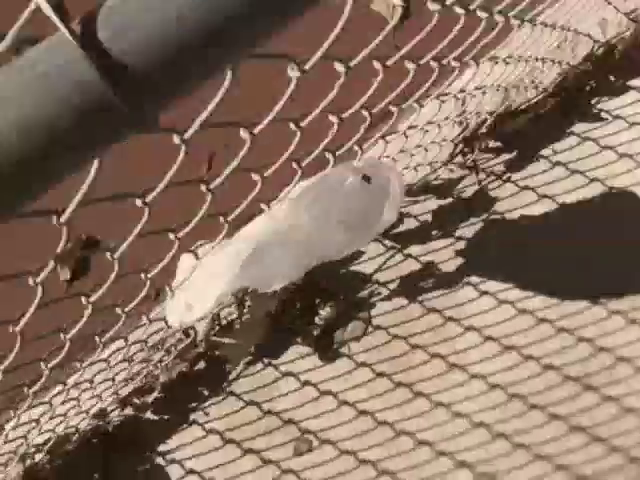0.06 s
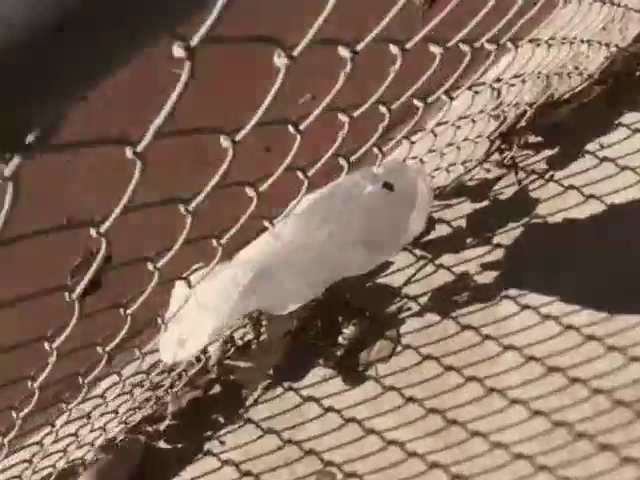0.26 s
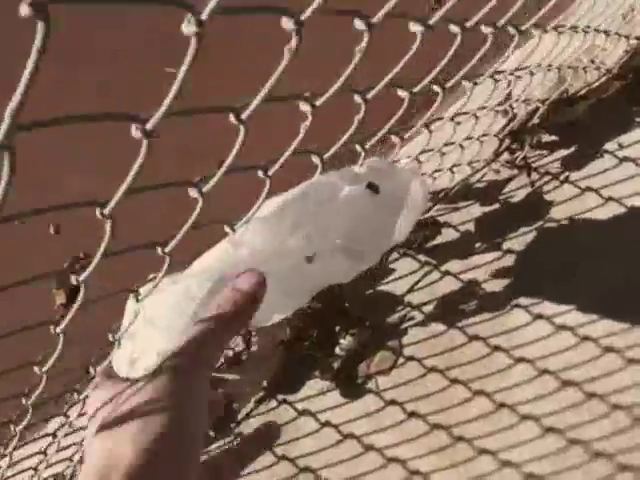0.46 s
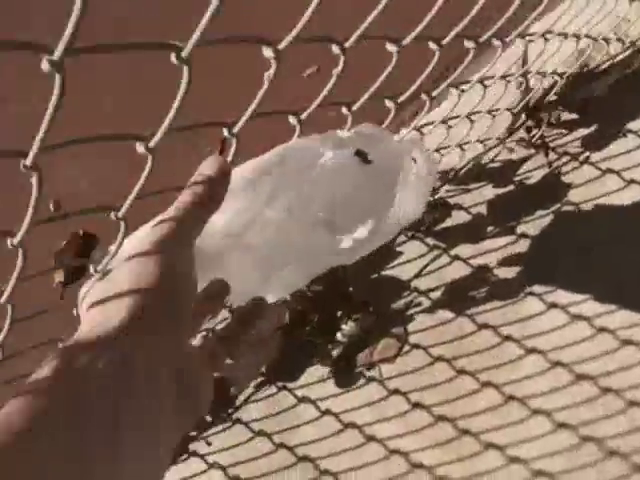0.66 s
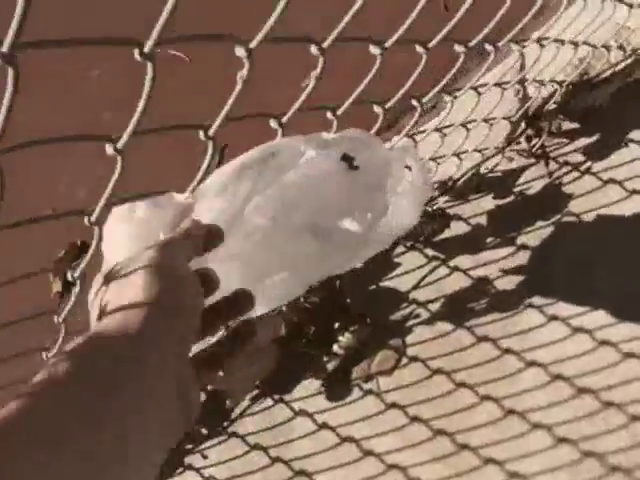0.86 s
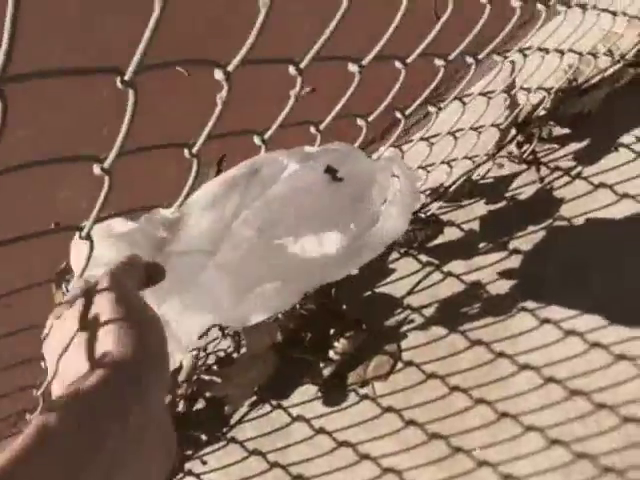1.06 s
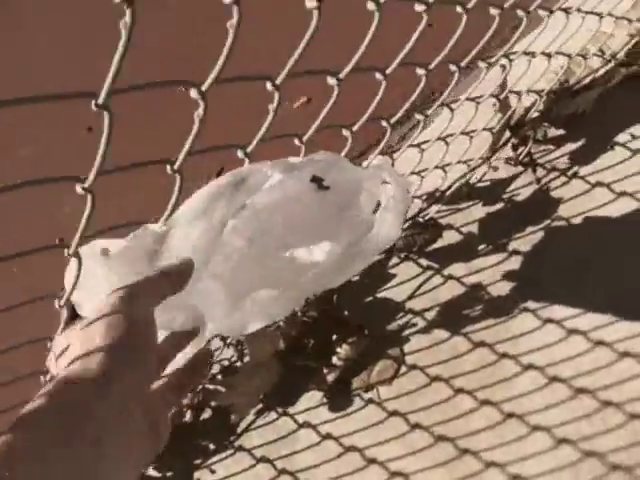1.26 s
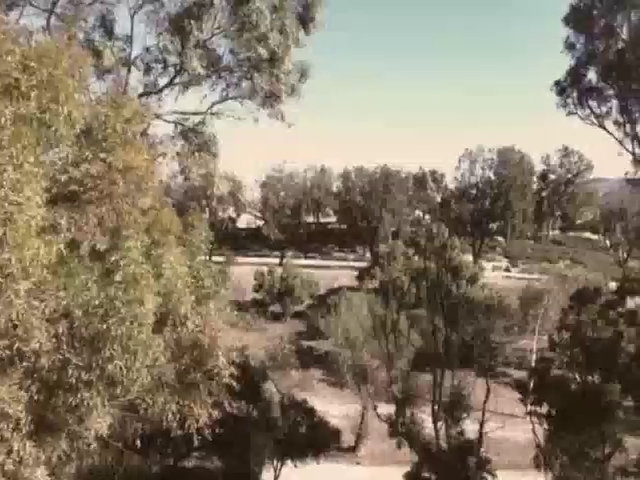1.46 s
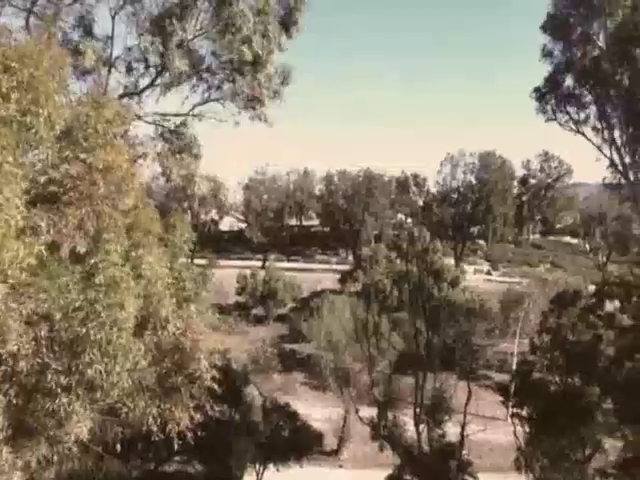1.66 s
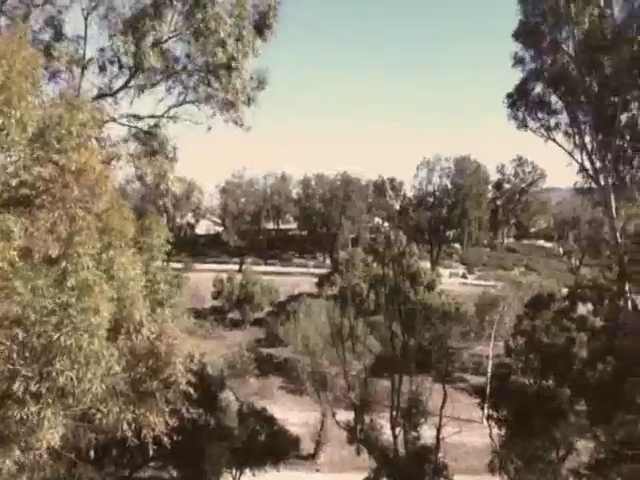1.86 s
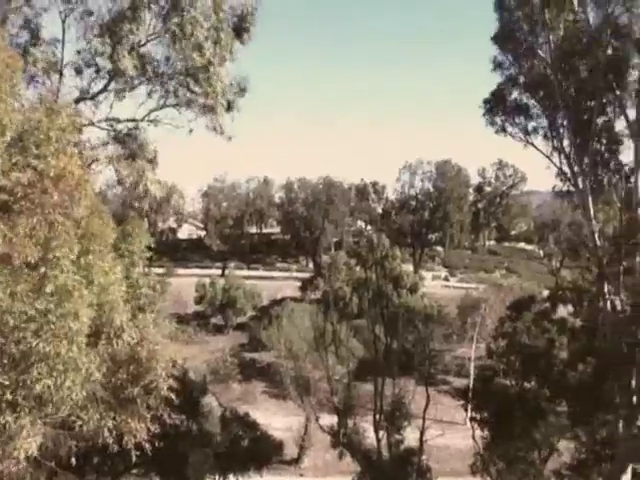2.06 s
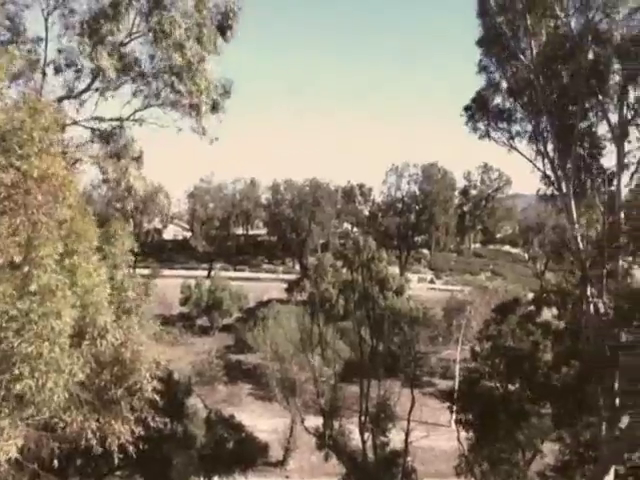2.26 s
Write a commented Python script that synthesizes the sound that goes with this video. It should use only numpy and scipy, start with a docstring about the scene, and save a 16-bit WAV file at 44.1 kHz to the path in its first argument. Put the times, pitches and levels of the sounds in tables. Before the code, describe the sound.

Wind buffets the microphone throughout with uneven rumble, slaps and thumps, hardest from 0.2 to 0.5 seconds. A tiny rustle opens the sound. From 0.5 to 1.45 seconds, a hand strokes thin plastic close by in four quiet, hissing, crackly sweeps. After a momentary dropout near 1.5 seconds, the wind thumps strongly again over the faint hiss of distant trees, easing off by about 2.3 seconds.

```python
"""Outdoors by a fence, with wind buffeting the microphone and a hand stroking thin plastic close by. The wind
rumbles and roars, and its eddies slap and thump on the microphone. A scrap of rustle comes first; then the
plastic, lying against the fence, hisses and crackles in four sweeps as skin slides and catches on it. After a
brief gap the scene changes: wind blows on over the soft hiss of distant trees."""
import sys
import numpy as np
from scipy import signal
from scipy.fft import rfft, irfft
from scipy.io import wavfile
from scipy.ndimage import uniform_filter1d

SR = 44100
rng = np.random.default_rng(int(sys.argv[2]) if len(sys.argv) > 2 else 0)


def materialize(psi):
    """Save the field psi as 16-bit PCM at rate SR to the path in sys.argv[1].

    A 1-D psi becomes a single channel; in a 2-D psi each row is a channel.
    """
    bounded = np.clip(np.atleast_2d(psi).T, -1, 1)
    quanta = np.round(bounded * 32767).astype(np.int16)
    wavfile.write(sys.argv[1], SR, quanta)


N = 105840
TIME, FREQS = np.arange(N) / SR, np.fft.rfftfreq(N, 1 / SR)
DROPOUT_S = 1.478  # the fence is heard before this, the trees after
LEAD = 1024  # samples ahead of a burst's onset


def amp(db):
    """Decibels to gain."""
    return 10 ** (np.asarray(db) / 20)

def unit(x):
    """Scales to rms 1."""
    return x / np.sqrt(np.mean(x ** 2) + 1e-20)

def curve(points):
    """Joins (seconds, value) points with straight lines."""
    return np.interp(TIME, *np.transpose(points))

def gain_at(freqs, spectrum):
    """Gain at each frequency, from (Hz, dB) points."""
    hz, db = np.transpose(spectrum)
    return amp(np.interp(np.log(freqs), np.log(hz), db))

def colour(x, spectrum):
    """Gives x a spectrum, at rms 1."""
    return unit(irfft(rfft(x) * gain_at(FREQS + 1, spectrum), N))

def noise(spectrum):
    """Steady noise shaped by (Hz, dB) points."""
    return colour(rng.standard_normal(N), spectrum)

def steadied(x, size):
    """Evens out chance swells longer than size samples."""
    return x / np.sqrt(uniform_filter1d(uniform_filter1d(x ** 2, size), size) + 1e-9)

def burst(peak_s, shape, size=4096):
    """A short swirl of noise, coloured by shape(Hz); about rms 1 at its height."""
    age = np.maximum(np.arange(size) - LEAD, 0) / SR / peak_s
    swell = (age * np.exp(1 - age)) ** 2
    swirl = rfft(swell * rng.standard_normal(size))
    swirl /= abs(swirl) + abs(swirl).mean()  # no chance resonance stands out
    sound = irfft(swirl * shape(np.fft.rfftfreq(size, 1 / SR) + 1))
    return unit(sound) * np.sqrt(np.mean(swell ** 2))

def add(mix, start_s, sound):
    """Mixes in a burst, allowing for its lead."""
    part = mix[max(round(start_s * SR) - LEAD, 0):][:len(sound)]
    part += sound[:len(part)]


# Wind pressure right on the microphone. Each row: time in seconds, level in dB.
WIND_PRESSURE = [(0, -37.5), (.022, -35), (.05, -48), (.078, -39), (.108, -46.5), (.155, -45), (.175, -31),
                 (.235, -22), (.28, -23.5), (.37, -31), (.44, -22.5), (.51, -21.5), (.575, -31.5),
                 (.68, -34.5), (.715, -21.5), (.79, -34), (.9, -23.5), (.97, -32.5), (1.015, -31.5),
                 (1.06, -41.5), (1.1, -31), (1.145, -40.5), (1.2, -25.5), (1.255, -46), (1.29, -31.5),
                 (1.39, -38), (1.465, -53), (1.495, -25), (1.555, -20.5), (1.59, -36.5), (1.68, -31.5),
                 (1.77, -37.5), (1.83, -45), (1.93, -39), (2.0, -33), (2.06, -30), (2.12, -32.5),
                 (2.165, -45), (2.22, -36.5), (2.265, -55), (2.31, -47), (2.4, -46.5)]
# Its low rumble and its higher roar. Each row: frequency in Hz, relative level in dB.
RUMBLE_SPECTRUM = [(20, -60), (40, -53), (62, -21), (100, -8), (140, 0.5), (185, 3.5), (260, -10.5),
                   (330, -10), (420, -17), (600, -31), (1000, -40.5), (2500, -82)]
ROAR_SPECTRUM = [(100, -31), (250, 3), (400, 3.5), (700, -9.5), (1100, -24), (1700, -32.5), (3500, -68.5)]

def wind(strong_db=-20, roar_growth=1.69):
    """Turbulence flutters and rumbles at the microphone; the roar grows faster as the wind rises."""
    level_db = curve(WIND_PRESSURE)
    flutter = np.tanh(noise([(5, -7), (18, 7), (45, -4), (110, -25), (400, -69)]))
    rumble = amp(level_db + 3 * flutter) * steadied(noise(RUMBLE_SPECTRUM), size=1200)
    roar_db = -30 + roar_growth * (level_db - strong_db) + 2 * flutter
    return rumble + amp(roar_db) * steadied(noise(ROAR_SPECTRUM), size=800)


# The background at the fence. Each row: frequency in Hz, relative level in dB.
FENCE_SPECTRUM = [(20, -21), (100, 0.5), (800, -3), (1500, -5.5), (2700, -10), (5000, -14), (9000, -19.5),
                  (15500, -24)]

def fence_air():
    """Faint open air all around the microphone."""
    return amp(-59.5) * noise(FENCE_SPECTRUM) * (TIME < DROPOUT_S)


# A rustle close by. Each row: frequency in Hz, relative level in dB.
RUSTLE_SPECTRUM = [(300, 9.5), (1200, -3), (3900, -2.5), (7500, -6.5), (8300, -15), (11700, -8.5),
                   (15500, -18)]
# Two thin rings within it. Each row: pitch in Hz, starting level in dB.
RUSTLE_RINGS = [(4500, -43), (12400, -50)]

def rustle(end_s=0.044, ring_width_hz=54, ring_fade_s=0.02):
    """A scrap of rustle with two fading rings, which stops short."""
    out = amp(-38.5) * noise(RUSTLE_SPECTRUM)
    for hz, db in RUSTLE_RINGS:
        resonance = 1 / (1 + ((FREQS - hz) / ring_width_hz) ** 2)
        ring = irfft(rfft(rng.standard_normal(N)) * resonance, N)
        out += amp(db) * unit(ring) * np.exp(-TIME / ring_fade_s)
    return out * (TIME < end_s)


# Loose plastic against the fence, barely heard. Each row: frequency in Hz, relative level in dB.
CRINKLE_SPECTRUM = [(500, -6), (1500, -3), (4000, -3), (7000, -5), (11000, -9.5), (15500, -13)]

def crinkles(ticks_per_s=130):
    """The wind stirs the loose plastic into faint ticks."""
    impulses = rng.standard_normal(N) * (rng.random(N) < ticks_per_s / SR)
    grain = rng.standard_normal(200) * np.hanning(200)
    ticks = signal.oaconvolve(impulses, grain, "same")
    return amp(-69) * colour(ticks, CRINKLE_SPECTRUM) * (TIME < DROPOUT_S)


# Eddies striking the microphone itself. Each row: start in seconds, slap level in dB,
# thump level in dB (both ahead of the overload), top of the slap in Hz.
EDDY_HITS = [(.021, -31, -31, 700), (.1695, -16.5, -20, 1700), (.176, -27, -22, 600),
             (.212, -20, -14.5, 850), (.226, -21.5, -17.5, 1600), (.251, -25, -18.5, 1100),
             (0.2974, -8, -24, 2350), (.304, -13, -18.5, 1280), (.308, -28, -9.5, 497),
             (.350, -23, -28, 1270), (.383, -28.5, -24, 1000), (.414, -18, -17.5, 1090),
             (0.4244, -8.5, -22, 1700), (.428, -13.5, -15, 2100), (.432, -13.5, -8.5, 520),
             (0.4628, -12, -22, 555), (.497, -21, -29, 960), (.506, -18.5, -22, 700),
             (0.594, -47, -22, 450), (.620, -39, -25.5, 450), (0.694, -29, -30, 810), (.706, -26, -21, 655),
             (.723, -21, -21, 805), (.762, -29.5, -21.5, 500), (.806, -43, -24.5, 450),
             (.850, -36, -24, 600), (.877, -20, -25, 1320), (.885, -15, -14.5, 825), (.930, -29, -29, 650),
             (.995, -53, -43, 450), (1.198, -22.5, -26, 480), (1.280, -31, -22.5, 580),
             (1.312, -33, -33, 543), (1.499, -17, -21, 800), (1.544, -13.5, -13, 1050),
             (1.604, -18, -15, 990), (1.609, -11.5, -16, 860), (1.644, -23, -21, 780),
             (1.679, -27, -27, 710), (1.695, -24.5, -21, 1180), (1.740, -37, -30, 860),
             (1.806, -33, -30, 720), (1.912, -36, -31.5, 597), (1.955, -37, -24.5, 500),
             (2.030, -33, -34, 900), (2.036, -17.5, -25, 1300), (2.043, -24.5, -30, 1190),
             (2.050, -25.5, -25, 940), (2.062, -40, -28, 600), (2.1, -28.5, -21, 694),
             (2.117, -39, -29, 700), (2.134, -33.5, -30, 890), (2.199, -61, -34.5, 400)]

def eddies(thump_hz=216.2, thump_octaves=0.54, overload_db=-3, low_hz=98, high_hz=2850):
    """Each eddy is a bright slap and a slower low thump; the hardest softly overload the microphone."""
    def slap_shape(f, top_hz):
        bass_cut = 1 + (174 / f) ** 4.5  # the microphone sheds the deepest bass
        slope = 1 + (f / 338) ** 2.02
        top_cut = 1 + (f / top_hz) ** 4.46
        return 1 / (bass_cut * slope * top_cut)

    def thump_shape(f):
        return np.exp(-0.5 * (np.log2(f / thump_hz) / thump_octaves) ** 2)

    pressure = np.zeros(N)
    for start_s, slap_db, thump_db, top_hz in EDDY_HITS:
        slap_peak_s = 0.0021 * (1020 / top_hz) ** 0.37  # brighter slaps are quicker
        slap = burst(slap_peak_s, lambda f: slap_shape(f, top_hz))
        thump = burst(peak_s=0.0043, shape=thump_shape)
        add(pressure, start_s, amp(slap_db) * slap + amp(thump_db) * thump)
    overloaded = amp(overload_db) * np.tanh(pressure / amp(overload_db))
    band = 1 / (1 + (low_hz / (FREQS + 1)) ** 11) / (1 + (FREQS / high_hz) ** 11)
    return irfft(rfft(overloaded) * band, N)


# Creases in the plastic, close by. Each row: start in seconds, level in dB, pitch in Hz.
CREASE_SNAPS = [(.031, -42, 6060), (.036, -38.5, 7100), (0.036, -36.5, 11100), (.078, -53, 4200),
                (.088, -42, 810), (.089, -45.5, 1950), (.187, -56, 5040), (0.321, -59, 3700),
                (.574, -45, 5030)]

def creases(peak_s=0.0012, width_octaves=0.3):
    """Creases give way with tiny snaps."""
    out = np.zeros(N)
    for start_s, db, hz in CREASE_SNAPS:
        snap = burst(peak_s, lambda f: 1 / (1 + (np.log2(f / hz) / width_octaves) ** 2))
        add(out, start_s, amp(db) * snap)
    return out


# The hand sweeping over the plastic at the fence. Each row: time in seconds, level in dB.
HAND_SWEEPS = [(.458, -73), (.478, -56.5), (.54, -53), (.62, -46.5), (.69, -48), (.725, -42.5),
               (.76, -39.5), (.785, -44), (.805, -58), (.85, -49.5), (.925, -45), (1.0, -50.5),
               (1.056, -55.5), (1.14, -46.5), (1.205, -44.5), (1.26, -53), (1.33, -48.5), (1.415, -44.5),
               (1.45, -55), (1.478, -63)]
# The thin film, heard from close by. Each row: frequency in Hz, relative level in dB.
FILM_SPECTRUM = [(300, -13), (900, -3.5), (1600, 0), (2750, -2), (3700, 1), (5200, 0.5), (7000, -0.5),
                 (10000, -1), (12300, 0), (15500, -2.5)]

def hand_strokes(grains_per_s=2500, grain_spread_db=5):
    """Skin slides over the film: countless tiny slips merge into a hiss, with larger grains in it."""
    sizes = amp(grain_spread_db * np.minimum(rng.exponential(1, N), 4))
    grains = sizes * rng.choice([-1, 1], N) * (rng.random(N) < grains_per_s / SR)
    rub = unit(noise(FILM_SPECTRUM) + amp(-5.5) * colour(grains, FILM_SPECTRUM))
    grip_db = 1.08 * noise([(5, 6), (60, -1), (200, -29), (600, -58)])
    return rub * amp(curve(HAND_SWEEPS) + grip_db) * (TIME < DROPOUT_S)


# Skin catching on that same film. Each row: start in seconds, level in dB, time to peak in seconds.
SKIN_CATCHES = [(.724, -42.5, .003), (.753, -40.5, 0.0027), (0.859, -43, .0015), (.912, -42, 0.0024),
                (.931, -41, 0.0018), (1.140, -40.5, .0045), (1.155, -47, 0.0015), (1.313, -44.5, .002)]

def scrapes():
    """Where the skin catches and lets go, the whole film crackles for a moment."""
    out = np.zeros(N)
    for start_s, db, peak_s in SKIN_CATCHES:
        crackle = burst(peak_s, lambda f: gain_at(f, FILM_SPECTRUM))
        add(out, start_s, amp(db) * crackle)
    return out


# Trees far from the microphone. Each row: frequency in Hz, relative level in dB.
TREE_SPECTRUM = [(20, -19), (100, 0.5), (600, -3.5), (950, -1.5), (1400, -5), (1750, -5.5), (2300, -6.5),
                 (3200, -12.5), (3620, -9.5), (4100, -13), (5700, -11), (7000, -15), (8200, -12),
                 (10000, -17.5), (12000, -18), (15500, -24)]

def distant_trees():
    """Wind hisses softly in the trees after the scene changes."""
    return amp(-54.5) * noise(TREE_SPECTRUM) * (TIME >= DROPOUT_S)


def scene():
    """The wind, the plastic at the fence and the far trees, all at one microphone."""
    mix = wind() + fence_air() + rustle() + crinkles() + eddies()
    mix += creases() + hand_strokes() + scrapes() + distant_trees()
    return mix[None]

def record(dry):
    """The sound drops out for a moment between the two places, and the highest treble is cut."""
    half_gap_s, fade_s, cutoff_hz = 0.0019, 0.017, 15750
    dropout = np.clip((abs(TIME - DROPOUT_S) - half_gap_s) / fade_s, 0, 1)
    lowpass = signal.firwin(511, cutoff_hz, window=("kaiser", 9), fs=SR)
    return signal.oaconvolve(dry * dropout, lowpass[None], "same")


dry = scene()
out = record(dry)
materialize(out)
```